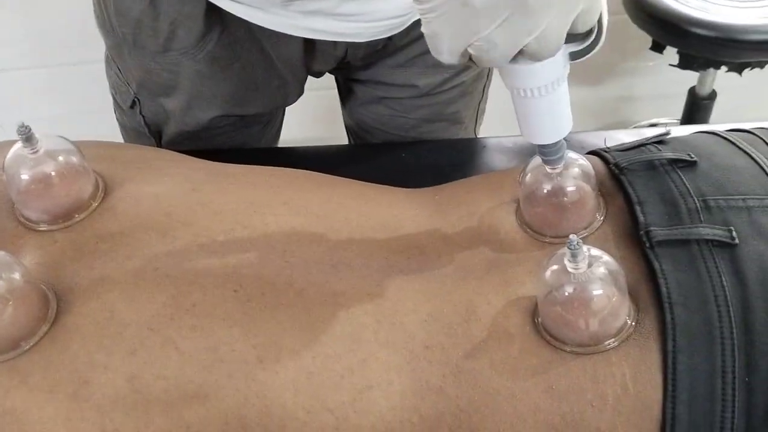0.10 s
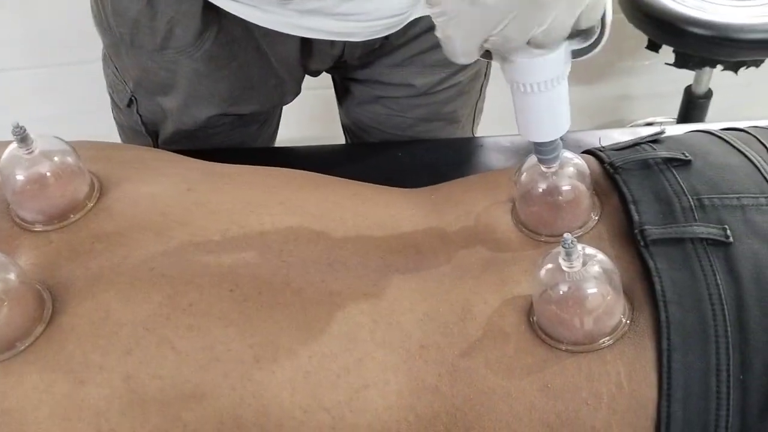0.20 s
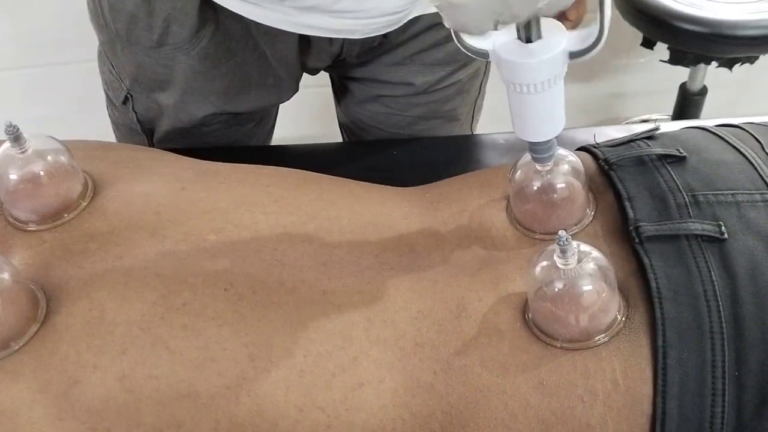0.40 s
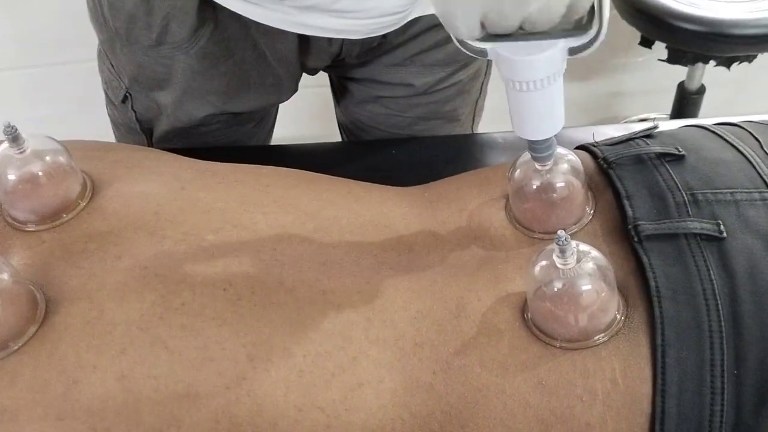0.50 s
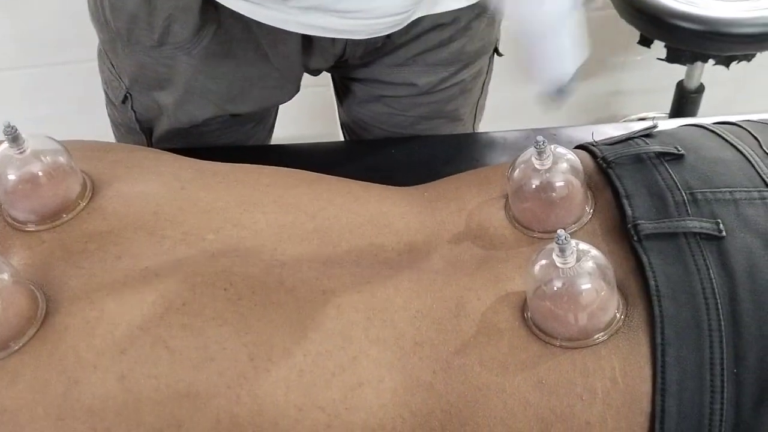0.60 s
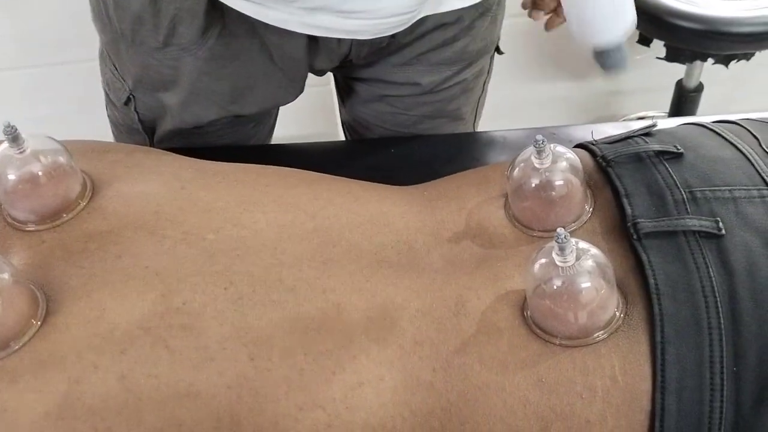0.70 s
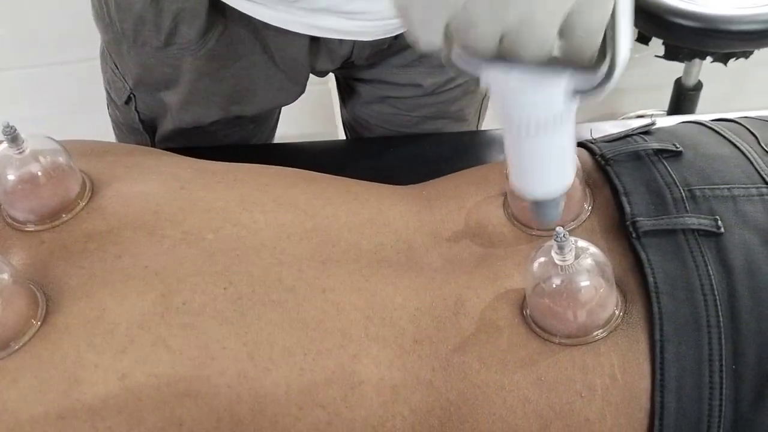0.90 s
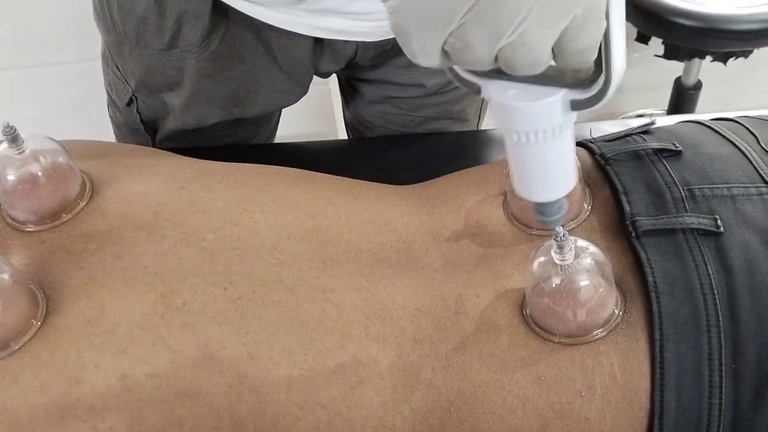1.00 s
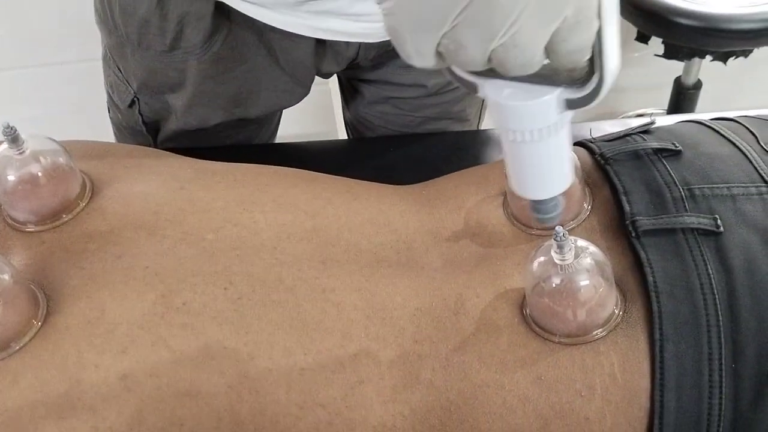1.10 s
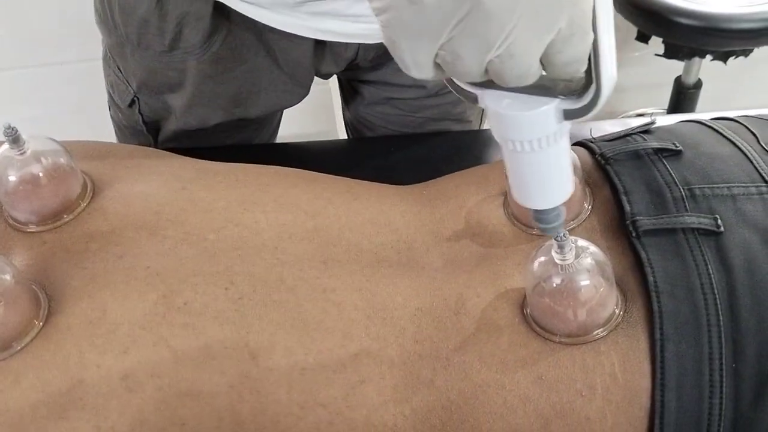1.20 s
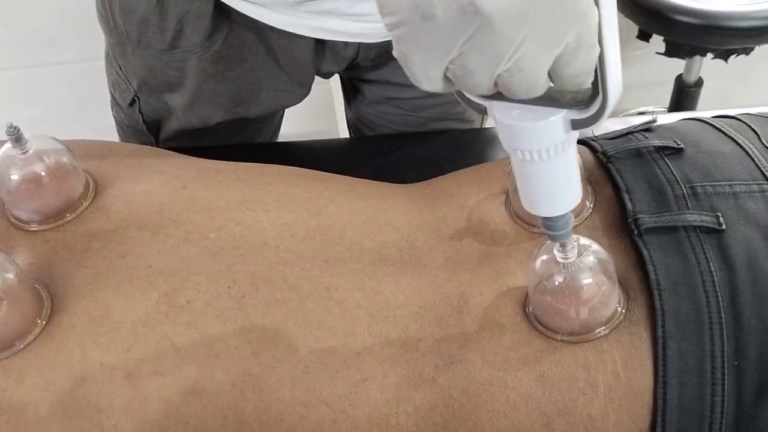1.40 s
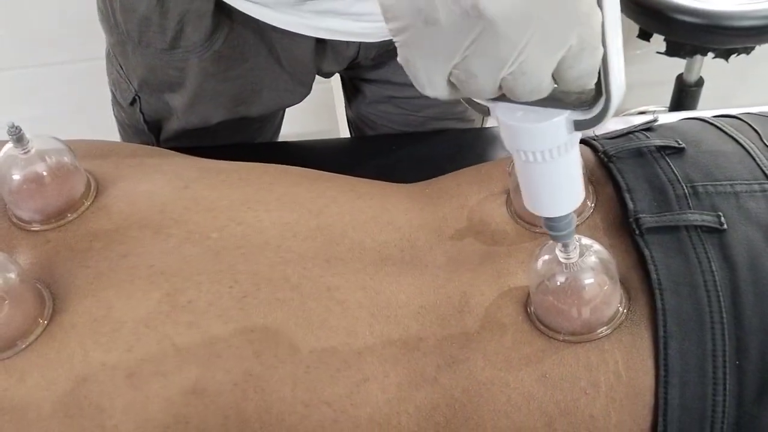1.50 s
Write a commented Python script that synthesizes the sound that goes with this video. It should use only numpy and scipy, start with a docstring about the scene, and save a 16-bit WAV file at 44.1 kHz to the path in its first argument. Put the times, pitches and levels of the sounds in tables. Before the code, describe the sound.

The fading echo of an earlier pump stroke opens, then a hard plunger snap rings out, a faint squeak and light ticks follow, and a second brighter clack sounds in a small reverberant room, heard close up.

```python
"""Hand vacuum pump in a tiled room

A plastic pistol-grip vacuum pump is worked on two suction cups in a hard, tiled room.
At each stroke the plunger snaps against its stop: a crack of shaped noise, ringing barrel, spring and
handle made of fading sines, and a soft noise thump. Crack and ring also hang in the room's reverb.
Light ticks, a short air squeak and a faint plunger slide are short noises, over a wavering hum and room noise."""
import sys
import numpy as np
from scipy import signal
from scipy.fft import rfft, irfft
from scipy.io import wavfile

SR = 44100
rng = np.random.default_rng(int(sys.argv[2]) if len(sys.argv) > 2 else 0)


def generate_wav(signal):
    """Clip the signal to [-1, 1] and save it as 16-bit WAV at the path in sys.argv[1]."""
    frames = np.transpose(np.atleast_2d(signal))
    scaled = np.clip(frames, -1, 1) * 32767
    pcm = np.round(scaled).astype(np.int16)
    wavfile.write(sys.argv[1], SR, pcm)


N = 70560  # length in samples
T = np.arange(N) / SR
FREQS = np.maximum(np.arange(N // 2 + 1) * SR / N, 1)

# Tone colour of the crack, also the basis for ticks, squeak and slide.
# Each row: frequency in Hz, relative strength in dB per Hz.
CRACK_COLOUR = [(30, -44.5), (100, -19.5), (200, -12.5), (550, -18.5), (800, -12.5), (1300, -15),
                (2000, -2.5), (2850, -3.5), (3300, 1), (4600, 5), (7200, 2.5), (8300, -15), (9400, -17.5),
                (10600, -36), (11400, -64.5), (14500, -44)]
# Notes at which the pump rings. One entry for each mode: pitch in Hz.
PUMP_MODE_HZ = [760, 1114, 1175, 1542, 1890, 2015, 2065, 2584, 2616, 3172, 3397, 3671, 3850, 4145, 4495,
                4587, 4846, 5072, 5200, 5419, 5912, 6365, 6639, 6786, 7085, 7292, 7371, 7784, 8130, 8371,
                8790]

ATTACK_S = 0.00077  # rise of cracks, ringing, ticks and squeak
TILT_PIVOT_HZ = 4500  # a treble tilt leaves this frequency unchanged


def undb(db):
    """Turn decibels into a gain."""
    return 10 ** (np.asarray(db) / 20)


def level(x, db):
    """Scale a sound to an rms level in dB, taken over the length of the whole scene."""
    rms = np.sqrt(np.mean(x ** 2) + 1e-30)
    return x * undb(db) / rms


def colour(points):
    """Join (Hz, dB) points into a spectrum, with straight lines on a log-frequency axis."""
    hz, db = np.array(points, float).T
    return np.interp(np.log(FREQS), np.log(hz), db)


def tilt(db_per_octave):
    """A spectrum slope that makes a sound brighter (positive) or duller (negative)."""
    return db_per_octave * np.log2(FREQS / TILT_PIVOT_HZ)


def noise(db):
    """Noise with the given spectrum: every frequency gets a random phase; the rms is 1."""
    phases = np.exp(2j * np.pi * rng.random(len(FREQS)))
    return level(irfft(undb(db) * phases, N), 0)


def envelope(rise, t60):
    """Quick rise, then an exponential fall of 60 dB in t60 seconds."""
    attack = 1 - np.exp(-T / max(rise, 1e-5))
    decay = np.exp(-np.log(1000) * T / max(t60, 1e-3))
    return attack * decay


def place(x, start):
    """Shift a sound to its starting time in seconds; a negative start leaves only its later part."""
    samples = np.arange(N)
    return np.interp(samples - round(start * SR), samples, x, left=0, right=0)


def background():
    """Steady room noise and a low hum, a sine whose loudness wavers at random."""
    # Each row: frequency in Hz, relative strength of the room noise in dB per Hz.
    floor_colour = [(24, -51), (36, -7), (48, 8), (75, -5), (120, 0), (170, -2), (260, -0.5), (420, 1),
                    (600, -9.5), (1200, -9), (2500, -18), (5000, -11.5), (7200, -16), (8500, -35.5),
                    (10000, -47), (15000, -47.5)]
    floor_db, hum_hz, hum_db = -64.5, 167.7, -71.5
    hum_waver_db = 3.5  # rms size of the waver
    waver = noise(colour([(1, 0), (8, -2), (25, -25), (100, -90)]))  # slow, mostly below 25 Hz
    hum = np.sin(2 * np.pi * hum_hz * T) * undb(hum_waver_db * waver)
    return level(noise(colour(floor_colour)), floor_db) + level(hum, hum_db)


def room_response():
    """Dense reflections from the tiles, as fading noise; the air makes the treble die sooner."""
    t60_s, delay_s, build_s = 0.69, 0.003, 0.01
    air_loss_db_per_s, air_hz = 3, 7900  # extra decay at air_hz, growing with frequency squared
    white = rfft(rng.standard_normal(N))
    reflections = np.zeros(N)
    edges = np.linspace(0, SR / 2, 16)  # 15 frequency bands
    for lo, hi in zip(edges[:-1], edges[1:]):
        band = irfft(white * (FREQS >= lo) * (FREQS < hi), N)
        loss = air_loss_db_per_s * ((lo + hi) / 2 / air_hz) ** 2
        reflections += band * undb(-loss * T)
    return place(reflections * envelope(build_s, t60_s), delay_s)


def reverb(x, room, db):
    """The room's answer to a sound: each instant sets off all the reflections, at a given level."""
    return level(signal.fftconvolve(x, room)[:N], db)


def body():
    """The pump's resonances lift the crack in a peak around each mode."""
    peak_db, half_width_hz = 8, 70
    peaks = [1 / (1 + ((FREQS - hz) / half_width_hz) ** 2) for hz in PUMP_MODE_HZ]
    return peak_db * np.max(peaks, axis=0)


def ring(cup, direct_db, room):
    """Barrel, spring and handle ring in their modes as fading sines, and the room holds each note."""
    # One row for each cup, one column for each mode: level in the room in dB.
    mode_room_db = [
        [-63, -74.5, -64.5, -49.5, -63, -47.5, -48.5, -48.5, -50, -44.5, -56.5, -63, -51.5, -55.5, -55.5, -62,
         -49, -50.5, -49.5, -49.5, -49.5, -49, -55.5, -48, -63.5, -51.5, -53.5, -55.5, -55.5, -58, -62.5],
        [-66, -63, -80, -61.5, -72, -55, -49.5, -52.5, -53.5, -52, -60, -60.5, -48.5, -47.5, -47, -45, -51,
         -49.5, -46, -55.5, -46.5, -56.5, -41, -46, -48, -47.5, -49, -53, -58, -57.5, -63.5],
    ]
    # One entry for each mode: time to fall by 60 dB in seconds.
    mode_t60_s = [.2, .4, .4, .33, .19, .36, .3, .3, .22, .17, .12, .14, .08, .13, .12, .1, .09, .2, .17,
                  .14, .2, .13, .16, .1, .09, .09, .1, .08, .09, .09, .09]
    direct_tilt_db_per_octave = 4.5  # high modes are heard more directly
    out = np.zeros(N)
    for hz, room_db, t60 in zip(PUMP_MODE_HZ, mode_room_db[round(cup)], mode_t60_s):
        mode = np.sin(2 * np.pi * (hz * T + rng.random())) * envelope(ATTACK_S, t60)
        brighter_db = direct_tilt_db_per_octave * np.log2(hz / TILT_PIVOT_HZ)
        direct = level(mode, room_db + direct_db + brighter_db)
        out += direct + reverb(mode, room, room_db)
    return out


def snaps():
    """The plunger hits its stop: a noise crack, the pump's ring and a low thump that swells in the room."""
    # Each row: start in seconds, cup (0 or 1), direct crack level in dB, crack 60 dB fall time in
    # seconds, crack tilt in dB per octave, direct ring level against the room in dB, thump level in dB.
    strokes = [(-.56, 0, -25.5, 0.12, -8, -6, -60), (0.2019, 0, -37, 0.066, -0.2, -1, -58),
               (1.0383, 1, -36.5, 0.05, 0.43, -5, -63)]
    # Each row: frequency in Hz, relative strength of the thump in dB per Hz.
    thump_colour = [(30, -40.5), (70, -8), (120, 4.5), (170, 14), (240, -18), (380, 2), (550, -13),
                    (1200, -50.5)]
    thump_rise_s, thump_t60_s = 0.06, 0.4
    crack_room_db = -1.5  # reverb against direct crack
    out = np.zeros(N)
    for start, cup, crack_db, t60, tilt_db, direct_db, thump_db in strokes:
        room = room_response()
        crack_shape = colour(CRACK_COLOUR) + body() + tilt(tilt_db)
        crack = noise(crack_shape) * envelope(ATTACK_S, t60)
        thump = noise(colour(thump_colour)) * envelope(thump_rise_s, thump_t60_s)
        snap = level(crack, crack_db) + reverb(crack, room, crack_db + crack_room_db)
        snap += ring(cup, direct_db, room)
        snap += level(thump, thump_db)
        out += place(snap, start)
    return out


def rub():
    """Faint sliding of the plunger as the grip is squeezed: dull noise that swells and fades."""
    middle_s, length_s = 0.2, 0.11  # the loudest moment; time from there to fall to about a third
    slide = noise(colour(CRACK_COLOUR) + tilt(-7))
    swell = np.exp(-((T - middle_s) / length_s) ** 2)
    return level(slide * swell, -72.5)


def ticks_and_squeak():
    """Small, quickly damped ticks and a short, faint squeak: bursts of noise around one pitch, with reverb."""
    # Each row: start in seconds, direct level in dB, 60 dB fall time in seconds, centre in Hz,
    # distance in octaves from the centre to where the band is 3 dB down.
    # The rows at 0.484 and 0.496 s make the air squeak, the others are ticks.
    bursts = [(0.1924, -71, 0.02, 5200, .35), (.484, -62.5, 0.062, 4630, .35),
              (.496, -76.5, .015, 8200, 0.1), (.546, -79.5, 0.084, 526, 0.26),
              (0.5735, -63, 0.014, 3950, 0.42), (0.572, -72, 0.025, 860, 0.51),
              (1.0374, -50, 0.0073, 6800, 0.7)]
    room_db = -7  # reverb against direct burst
    out = np.zeros(N)
    room = room_response()
    for start, db, t60, hz, octaves in bursts:
        band_loss_db = 10 * np.log10(1 + (np.log2(FREQS / hz) / octaves) ** 4)
        burst = noise(colour(CRACK_COLOUR) - band_loss_db) * envelope(ATTACK_S, t60)
        out += place(level(burst, db) + reverb(burst, room, db + room_db), start)
    return out


def scene():
    """Pump and room added together, in mono."""
    return (snaps() + ticks_and_squeak() + rub() + background())[None]


def record(dry):
    """The recorder cuts the top: a steep low-pass filter at 15.7 kHz."""
    top_cut = signal.ellip(8, 0.2, 70, 15700, fs=SR, output="sos")
    return signal.sosfilt(top_cut, dry)


dry = scene()
out = record(dry)
generate_wav(out)
```